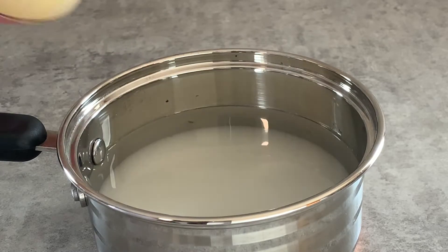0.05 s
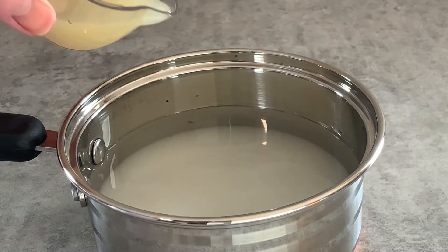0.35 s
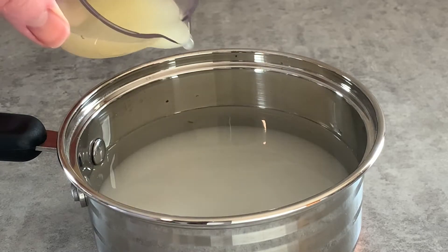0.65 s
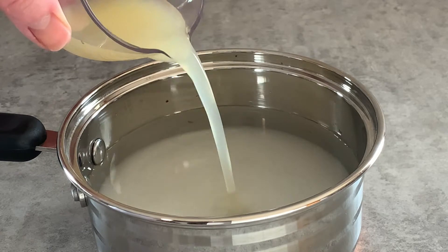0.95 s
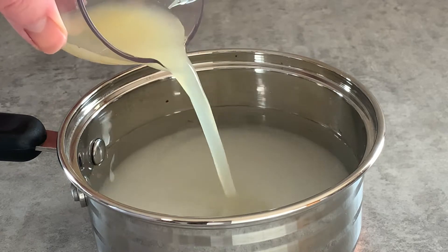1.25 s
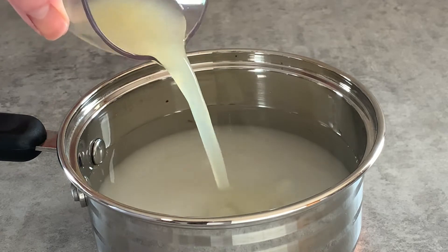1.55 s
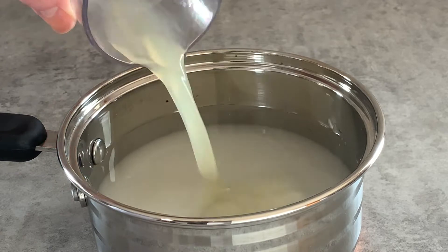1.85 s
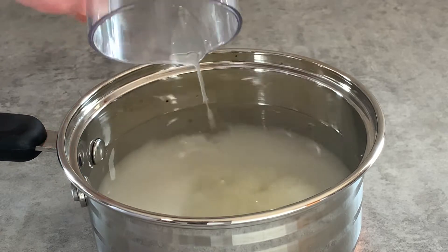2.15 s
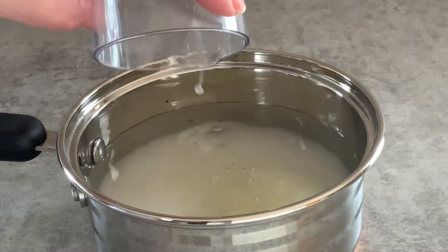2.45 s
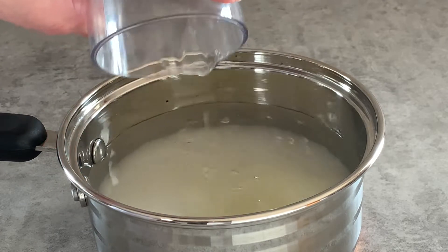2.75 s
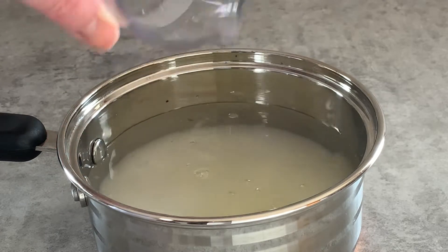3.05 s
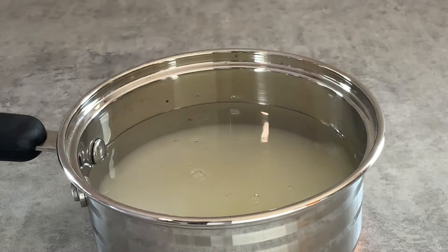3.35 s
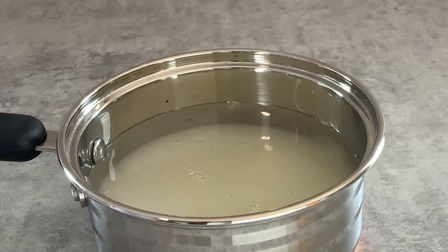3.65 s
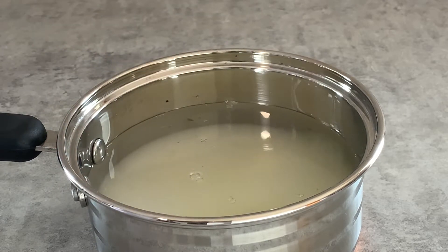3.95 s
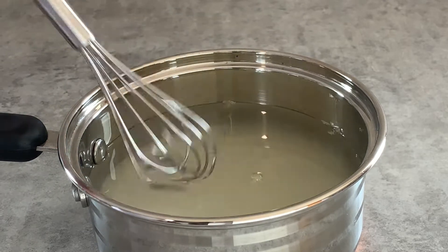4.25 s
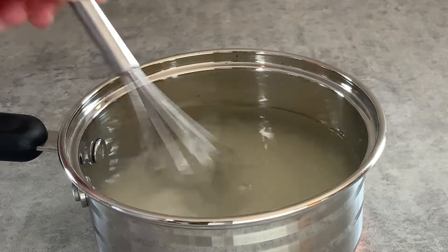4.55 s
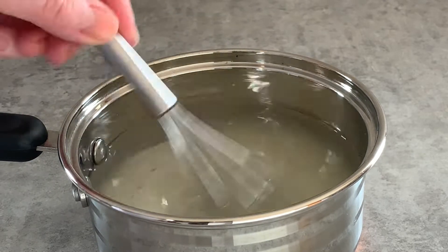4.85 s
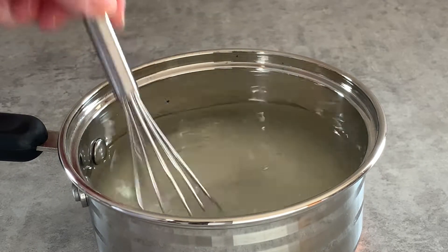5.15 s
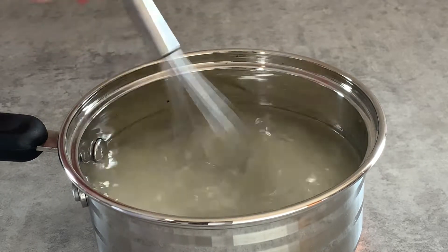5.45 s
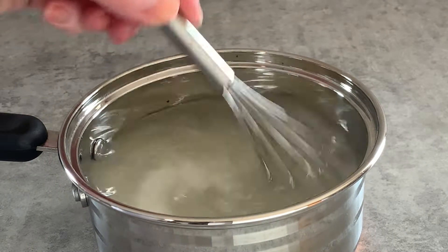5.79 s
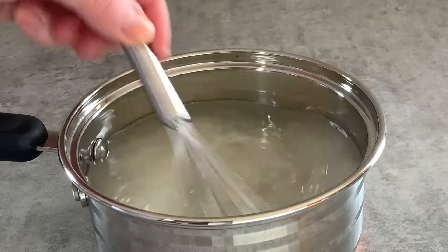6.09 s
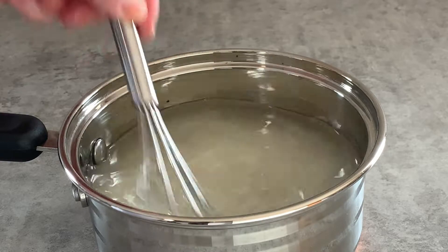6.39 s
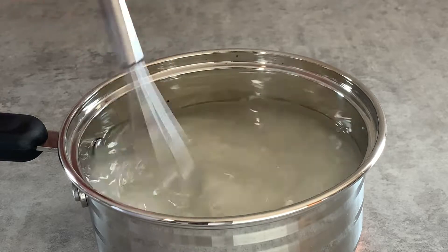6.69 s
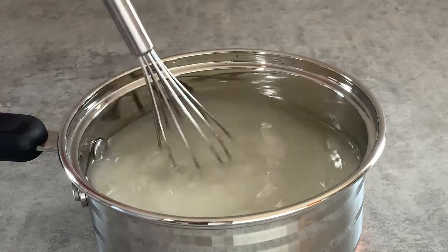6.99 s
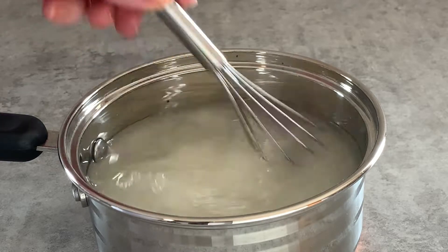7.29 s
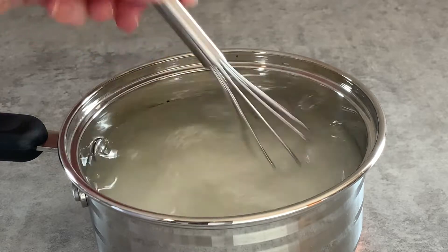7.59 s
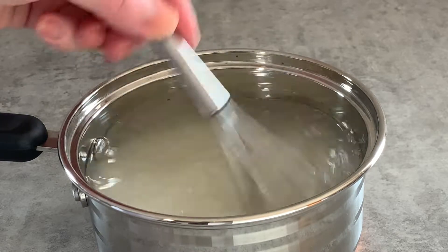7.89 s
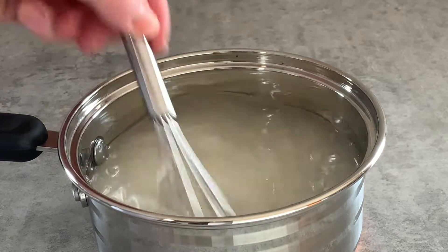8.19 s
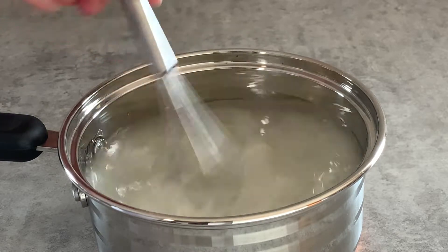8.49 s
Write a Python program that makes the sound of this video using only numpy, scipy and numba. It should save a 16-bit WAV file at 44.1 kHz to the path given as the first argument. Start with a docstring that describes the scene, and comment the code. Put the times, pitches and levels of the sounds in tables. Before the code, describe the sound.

After a few faint drips, a metal whisk stirs sugar water in a saucepan, with gritty scraping, sloshing and clicks over a soft kitchen hum.

```python
"""A wire whisk sweeps to and fro in a steel saucepan of sugar water. Its wires grind sugar over the
bottom, churn up bubbles and clack against the wall, which rings briefly, damped by the water.
Before the whisking, juice slides in almost silently, with a few drips.
Behind it all is a small kitchen with a humming appliance, heard by a phone with two microphone
ports close to the pan."""
import sys
import numpy as np
from scipy import signal
from scipy.fft import rfft, irfft, next_fast_len
from scipy.io import wavfile
from scipy.ndimage import uniform_filter1d
from numba import njit

SR = 44100
rng = np.random.default_rng(int(sys.argv[2]) if len(sys.argv) > 2 else 0)


def generate_wav(signal):
    """Clip the signal to [-1, 1] and save it as 16-bit WAV at the path in sys.argv[1]."""
    frames = np.transpose(np.atleast_2d(signal))
    scaled = np.clip(frames, -1, 1) * 32767
    pcm = np.round(scaled).astype(np.int16)
    wavfile.write(sys.argv[1], SR, pcm)


N = 380583
TIME = np.arange(N) / SR
FFT_SIZE = next_fast_len(N + SR)
LOG_HZ = np.log(np.maximum(np.arange(FFT_SIZE // 2 + 1) * SR / FFT_SIZE, 1))

# Table levels are faders: they set the balance within a layer, ahead of its EQ and trim.
# room tone, its stereo side signal, and the reverb: freq_hz, gain_db
AIR_EQ = [(25, -24), (36, -14), (50, 3), (90, 0), (160, 3.5), (340, 2), (410, -4), (560, -7), (800, -9),
          (930, -14), (1080, -14), (2600, -27.5), (4600, -34), (6100, -29.5), (7500, -34), (9600, -52.5),
          (11500, -37), (15000, -47)]
SIDE_EQ = [(60, -8.5), (200, -6.5), (500, -2.0), (1200, 0.0), (5000, 0.0)]
REVERB_EQ = [(45, -19), (100, -9), (600, 1.5), (1300, 7.5), (5000, 3.5), (7500, -2.5), (9500, -14),
             (12000, 1), (15000, -2)]
# partials of the appliance's hum: pitch_hz, level_db
HUM_PARTIALS = [(119.8, -64.5), (157, -71), (205.5, -63), (237, -69.5), (256, -77.5), (295.7, -68.5),
                (318, -72), (357, -65), (414.8, -76), (474, -79.5), (621, -77), (707, -80.5), (894, -77.5)]
# thin bands of hiss from the appliance: centre_hz, width_hz, level_db
WHINE_BANDS = [(911, 21, -72.5), (2770, 92, -85), (6100, 130, -85)]
# stereo image at the microphone ports: freq_hz, left_lead_rad, left_minus_right_db
PORT_IMAGE = [(300, 0, 1.5), (650, -.3, -3), (1250, -.4, -4.5), (2100, -1.5, 4), (3000, -3.1, 1.5),
              (4100, -6.3, 4), (4900, -9, 8), (6200, -12.2, 1), (7400, -11.6, -1), (9600, -9.4, 0),
              (12600, -6.4, 0), (14000, -6.2, 0), (15600, -3.7, 0)]
# brief dips in the overall level: start_s, end_s
LEVEL_DIPS = [(1.912, 1.929), (1.955, 1.980), (4.069, 4.105)]

# drips from the jug: start_s, bubble_pitch_hz, bubble_db, tick_db
JUICE_DRIPS = [(0.836, 6600, -38, -36.5), (0.839, 1630, -52, -47), (0.841, 1305, -44, -39),
               (0.849, 1400, -50, -50), (.856, 1230, -48, -48), (0.84, 1040, -48, -44),
               (1.375, 12700, -41, -60), (1.521, 7600, -69, -69), (2.056, 2070, -47, -47),
               (2.063, 11800, -37, -54), (2.0717, 7700, -37, -37), (2.089, 2970, -43, -47),
               (2.097, 4760, -41, -65), (2.106, 8900, -27, -60), (2.1096, 4510, -31, -31.5),
               (2.1158, 6430, -44, -44), (2.128, 5900, -51, -51), (2.1338, 5870, -37, -42),
               (2.243, 1590, -49, -68)]
# soft rustles of spray and handling: start_s, level_db, decay_s
SOFT_RUSTLES = [(0.843, -57, 0.039), (3.034, -56, 0.093), (4.112, -58, 0.21)]
# tone of the drip ticks and of the rustles: freq_hz, gain_db
TICK_EQ = [(200, -12), (1000, -6), (3000, -10.5), (6000, 4), (12000, -2), (15000, -5)]
RUSTLE_EQ = [(200, 20), (1000, -0.5), (2500, 1.5), (4000, -5.5), (5500, -16), (15000, -33)]

# sweeps of the whisk across the pan: start_s, length_s, scrape_db, churn_db
SWEEPS = [(4.353, 0.1, -47, -50.5), (4.508, 0.15, -66, -51), (4.59, 0.18, -49.5, -51),
          (4.838, 0.17, -46, -56), (5.061, 0.2, -44, -51), (5.304, 0.2, -41.5, -52.5),
          (5.597, .15, -42.5, -53.5), (5.818, .25, -42.5, -53.5), (6.089, 0.15, -43, -51.5),
          (6.26, 0.12, -40.5, -51), (6.39, 0.12, -45.5, -57), (6.514, 0.13, -40, -50),
          (6.67, 0.11, -49.5, -66), (6.734, 0.25, -39.5, -50), (7.008, 0.21, -41.5, -57),
          (7.206, 0.16, -41, -50.5), (7.377, 0.19, -40, -59), (7.583, 0.2, -40, -50),
          (7.728, 0.2, -39, -50), (7.884, 0.17, -36.5, -55), (8.025, 0.19, -39.5, -47.5),
          (8.18, 0.17, -40, -50.5), (8.31, 0.24, -38.5, -48), (8.535, .12, -42, -50)]
# air and wall resonances that colour the water: centre_hz, width_hz, level_db
HOLLOW_MODES = [(433, 150, 1), (833, 27, -12.5), (1040, 115, 1.5), (1266, 106, 4.5), (1840, 160, -33),
                (2330, 260, 0)]
# tone of the lone, mid-sized bubbles: freq_hz, gain_db
PLOP_EQ = [(330, 3.5), (500, -2.5), (750, -1.5), (1050, 1.5), (1600, -5), (2300, 1.5)]
# waves slapping the wall: start_s, slap_db, thump_db
WAVES = [(4.35, -43, -58), (5.22, -49, -50), (5.74, -40, -57), (6.02, -46.5, -66), (6.308, -40.5, -58),
         (6.88, -34, -51), (7.04, -49, -50), (7.28, -42, -54.5), (7.81, -42.5, -58), (8.06, -44, -61),
         (8.32, -45.5, -62)]
# large air pockets closing behind the whisk: start_s, pitch_hz, level_db
AIR_POCKETS = [(4.367, 1208, -43), (4.366, 430, -43), (4.395, 1137, -47.5), (4.432, 1030, -47),
               (4.529, 1005, -40.5), (4.572, 1024, -42.5), (4.621, 1256, -42), (4.748, 1096, -45),
               (4.899, 2320, -48), (4.93, 1050, -45), (5.032, 383, -40), (5.105, 642, -45.5),
               (5.18, 1000, -39.5), (5.182, 2280, -48), (5.262, 1030, -49), (5.416, 1020, -42),
               (5.73, 978, -41), (5.741, 368, -35.5), (5.757, 2064, -34.5), (5.87, 832, -40),
               (5.897, 1065, -39.5), (6.042, 493, -40.5), (6.045, 1270, -43.5), (6.164, 1034, -43.5),
               (6.412, 1034, -41.5), (6.441, 1030, -41.5), (6.554, 1320, -35.5), (6.591, 1036, -40.5),
               (6.689, 1100, -43), (6.721, 1000, -45), (6.772, 1050, -40), (6.835, 422, -35.5),
               (6.851, 1420, -30.5), (6.872, 297, -36), (6.904, 418, -33), (6.906, 586, -33),
               (6.924, 337, -32.5), (6.955, 597, -42), (6.985, 587, -45), (7.051, 316, -35.5),
               (7.062, 426, -37), (7.07, 1490, -35), (7.1, 416, -37), (7.212, 1320, -42),
               (7.264, 1700, -38), (7.27, 706, -38), (7.283, 383, -38), (7.321, 503, -38.5),
               (7.469, 1056, -37.5), (7.513, 2245, -34.5), (7.699, 434, -51), (7.766, 1284, -40),
               (7.817, 435, -34), (7.817, 1226, -39.5), (7.86, 475, -43), (8.068, 394, -34.5),
               (8.104, 460, -39.5), (8.333, 416, -37), (8.412, 1050, -39.5), (8.472, 1090, -28.5),
               (8.492, 1110, -38), (8.519, 1055, -41), (8.568, 2350, -33.5), (8.572, 480, -38)]

# wire resonances of the whisk: centre_hz, width_hz, level_db
WIRE_MODES = [(2295, 560, -0.5), (4680, 106, -7), (5470, 210, 5.5), (6820, 130, 6), (7560, 120, 0.5),
              (8610, 480, 16), (11320, 860, 8.5)]
# tone of the grinding sugar and of the wires' rattle: freq_hz, gain_db
GRIND_EQ = [(400, -11.5), (1500, -6.5), (3000, -0.5), (3500, -4), (4300, -4.5), (5300, -7), (6500, -0.5),
            (7400, -2.5), (9100, 2), (10500, 2.5), (12500, 6), (15000, -3.5)]
RATTLE_EQ = [(150, -34), (400, -4), (1000, -9.5), (2100, -6), (3100, -10.5), (4500, -2), (5500, 0.5),
             (6700, -1), (9000, 1), (11000, -5), (13000, -5.5), (15000, -6.5)]
# short gliding tones: wires dragging along the bottom, and a few rising bubbles: start_s, length_s, from_hz,
# to_hz, level_db
GLIDES = [(4.951, 0.11, 1800, 2020, -56.5), (5.407, .04, 8000, 7700, -45),
          (5.649, 0.051, 7800, 7800, -42.5), (5.69, 0.021, 7900, 7800, -45),
          (5.944, 0.032, 7700, 7100, -50), (5.995, 0.034, 6640, 6350, -44),
          (6.001, 0.048, 2970, 3130, -45), (5.981, 0.061, 2220, 2350, -53.5),
          (6.571, 0.03, 3770, 4170, -43.5), (7.017, 0.03, 2450, 2110, -40.5),
          (7.914, 0.056, 2300, 2160, -48), (7.94, 0.048, 9200, 9200, -39)]
# modes of the steel wall: pitch_hz, level_db, t60_s
WALL_MODES = [(711, -13, .2), (1196, -10, .1), (1305, -8, .15), (1438, -10, .12), (1636, -13, .12),
              (1870, -6, .1), (1950, -2, .06), (2028, -1.5, .12), (2130, -4, .05), (2374, -7, .07),
              (2520, -12, .06), (3260, -21, .07), (3677, -22, .2), (4315, -6, .18), (4472, -8, .18),
              (4700, -6, .05), (4805, -9, .2), (5520, -13, .13), (6083, -11, .17), (6885, -7, .18),
              (7380, -9, .12)]
# wires striking the pan: start_s, contact_db, rattle_decay_ms, wall_db, twang_pitch_hz, twang_db
WIRE_HITS = [(4.363, -39.5, 7.5, -65, 4600, -55), (5.477, -29, 1.5, -70, 8800, -51),
             (5.754, -34, 8.3, -37, 5100, -37), (6.038, -48, 2.6, -53, 6280, -33),
             (6.186, -34, 5.3, -55, 8780, -26.5), (6.324, -28, 3.3, -46, 7200, -46),
             (6.412, -44, 3, -67, 9000, -40), (6.443, -37, 3.4, -64, 9240, -28.5),
             (6.523, -47, 5, -46, 3160, -35), (6.829, -24, 2.9, -53, 11500, -43),
             (6.836, -26.5, 5.4, -40, 6900, -30), (6.852, -33, 3.1, -58, 5400, -35),
             (6.868, -24.5, 2.5, -55, 7160, -47), (6.903, -21, 2.6, -62, 6960, -19.5),
             (6.915, -26, 5.3, -59, 6960, -36), (6.92, -30, 1.9, -58, 6830, -26),
             (7.047, -24, 7.8, -33, 4170, -29.5), (7.07, -27.5, 16, -47, 5630, -43),
             (7.090, -19.5, 3.2, -54, 9000, -21), (7.095, -27, 2.4, -49, 5330, -24),
             (7.117, -37, 3.5, -51, 5500, -29), (7.236, -32, 6, -57, 4360, -34.5),
             (7.246, -28, 4.4, -55, 5320, -30), (7.263, -24.5, 5.4, -43, 4640, -31),
             (7.47, -33, 1.8, -58, 11200, -49), (7.576, -25, 4.1, -43, 4850, -39),
             (7.8116, -20.5, 2.5, -49, 7060, -20.5), (8.055, -11, 4.6, -23.5, 4650, -19.5),
             (8.313, -28.5, 2.5, -43.5, 7000, -35), (8.316, -24.5, 3.5, -44, 6255, -25.5),
             (8.344, -37, 2.6, -48, 6330, -40), (8.376, -37, 1.7, -54, 9500, -40),
             (8.470, -35, 3, -41, 8380, -32)]

ROOM_T60_S, TREBLE_T60_S, TREBLE_HZ = .45, .19, 7450  # the tail dies sooner in the treble
DRIP_CYCLES, GLUG_CYCLES = 7.3, 10.4  # cycles to fade by 1/e; for glugs, at 1 kHz
SWEEP_RISE_S, SWEEP_FALL_S = .028, .044  # the hand speeds up, holds, slows for the turn
WAVE_RISE_S, WAVE_DECAY_S = .017, .091
HOLLOW_SWAY, SWAYS_PER_S = .038, 9  # share by which the rocking water bends the hollow's pitches
FLICK_DB, FLICKS_PER_S = 2.5, 24  # the wires catch and let go within a sweep
REBOUND_S, REBOUND_DB = .0045, -33  # a second wire lands just after the first
TWANG_RISE_S = .0016
TWIN_DB, TWIN_DETUNE = -4, .0134  # each wall mode's weaker partner, and its widest detune as a share


def undb(db):
    """Decibels to gain."""
    return 10 ** (np.asarray(db) / 20)


def level(x, db=0):
    """Set the rms level."""
    return x * undb(db) / np.sqrt(np.mean(x ** 2))


def curve(rows, column=1):
    """Draw one column of a table across the spectrum, on a log-frequency axis."""
    rows = np.array(rows)
    return np.interp(LOG_HZ, np.log(rows[:, 0]), rows[:, column])


def eq(x, points):
    """Minimum-phase EQ through points of freq_hz, gain_db."""
    cepstrum = irfft(np.log(undb(curve(points))), FFT_SIZE)
    cepstrum[1:FFT_SIZE // 2] *= 2
    cepstrum[FFT_SIZE // 2 + 1:] = 0
    return irfft(rfft(x, FFT_SIZE) * np.exp(rfft(cepstrum)), FFT_SIZE)[..., :N]


def resonate(x, hz, width_hz):
    """One resonance, unity gain at its centre."""
    return signal.lfilter(*signal.iirpeak(hz, hz / width_hz, SR), x)


@njit
def gliding_resonance(x, hz, width_hz):
    """A resonance whose centre follows a pitch curve."""
    out, state = np.empty(len(x)), 0j
    for i in range(len(x)):
        state = state * np.exp((2j * hz[i] - width_hz) * np.pi / SR) + x[i]
        out[i] = state.imag
    return out


def drift(per_s):
    """Smooth random modulation with a spread near 1."""
    knots = rng.standard_normal(4096)
    return np.interp(TIME * per_s, np.arange(len(knots)), knots)


def flicker_bands(x, low_hz, high_hz, count, depth_db, per_s):
    """Let neighbouring bands swell and fade, each on its own."""
    centres = np.linspace(np.log(low_hz), np.log(high_hz), count)
    spectrum = rfft(x, FFT_SIZE)
    bands = (irfft(spectrum * np.interp(LOG_HZ, centres, solo), FFT_SIZE)[:N] for solo in np.eye(count))
    return sum(band * undb(depth_db * drift(per_s)) for band in bands)


def add(track, start_s, sound):
    """Mix a sound into a track."""
    i = int(start_s * SR)
    track[i:i + len(sound)] += sound[:len(track) - i]


def burst(decay_s, rise_s):
    """A noise hit that swells quickly and dies away."""
    t = TIME[:SR // 5]
    return rng.standard_normal(len(t)) * (1 - np.exp(-t / rise_s)) * np.exp(-t / decay_s)


@njit
def grains(start_s, hz, gain, cycles, glide):
    """Damped sines whose pitch rises as they fade."""
    out = np.zeros(N)
    for k in range(len(start_s)):
        start, life, phase = int(start_s[k] * SR), cycles[k] * SR / hz[k], 0.
        for i in range(min(int(6 * life), N - start)):
            phase += 2 * np.pi * hz[k] * (1 + glide * i / life) / SR
            out[start + i] += gain[k] * np.exp(-i / life) * (1 - np.exp(-phase / 4)) * np.sin(phase)
    return out


def swarm(count, low_hz, high_hz, cycles, spread_db, glide):
    """An even shower of grains at unit rms: many quiet, few loud."""
    when, pitch, size, life = rng.random((count, 4)).T
    hz = low_hz * (high_hz / low_hz) ** pitch
    gain = undb(-spread_db * np.log(1 - .985 * size)) * np.sqrt(hz / low_hz)
    return level(grains(when * N / SR, hz, gain, cycles * (.5 + life), glide))


def kitchen():
    """The bed: airy room tone, narrower in the bass, with an appliance's wavering hum and thin whine."""
    left_right = np.array([[1], [-1]])
    mid, side = eq(rng.standard_normal((2, N)), AIR_EQ)
    air = undb(-58) * (mid + eq(side, SIDE_EQ) * left_right) / mid.std()
    hum = whine = 0
    for hz, db in HUM_PARTIALS:
        peak = np.sqrt(2) * undb(db + 2 * drift(7.6))
        hum += peak * np.sin(2 * np.pi * hz * TIME + .72 * drift(12))
    for hz, width_hz, db in WHINE_BANDS:
        hiss = resonate(rng.standard_normal((2, N)), hz, width_hz)
        whine += level(hiss, db) * undb(2.2 * drift(11))
    return (air * undb(.4 * drift(2.35)) + hum + whine) * undb(.64 * left_right)


def reverb(x, tail_db, early_db, early_decay_s):
    """The kitchen's darkening stereo tail, plus quick, shifting reflections off pan and worktop."""
    t = TIME[:SR * 3 // 4]
    noise = rng.standard_normal((2, len(t)))
    body = signal.sosfiltfilt(signal.butter(3, TREBLE_HZ, fs=SR, output="sos"), noise)
    treble = (noise - body) * np.exp(-np.log(1000) * t * (1 / TREBLE_T60_S - 1 / ROOM_T60_S))
    fade = np.exp(-np.log(1000) * t / ROOM_T60_S) * (1 - np.exp(-t / .018))
    tail = undb(tail_db) * (body + treble) * fade / np.linalg.norm(fade)
    wet = signal.fftconvolve(x[None], tail, axes=1)[:, :N]
    early = (np.exp(-t / early_decay_s) * (1 - np.exp(-t / .00065)))[:SR // 10]
    # the source wanders among four places in the pan, each with its own reflections
    places = np.array([drift(6) for _ in range(4)])
    for share in places / np.linalg.norm(places, axis=0):
        response = undb(early_db) * rng.standard_normal((2, len(early))) * early / np.linalg.norm(early)
        wet += signal.oaconvolve((share * x)[None], response, axes=1)[:, :N]
    return eq(wet, REVERB_EQ)


def mic_ports(x):
    """Close sound turns stereo as it takes different paths round the phone to the two ports."""
    left = np.exp(.5j * curve(PORT_IMAGE)) * undb(curve(PORT_IMAGE, column=2) / 2)
    return irfft(rfft(x, FFT_SIZE) * np.array([left, 1 / left]), FFT_SIZE)[:, :N]


def pour():
    """Drops tick on the surface and trap a bubble each; spray and handling rustle softly."""
    ticks, rustle = np.zeros(N), np.zeros(N)
    drip_s, hz, bubble_db, tick_db = np.array(JUICE_DRIPS, float).T
    for start_s, db in zip(drip_s, tick_db):
        add(ticks, start_s, undb(db + 1.5) * burst(decay_s=.0015, rise_s=.00043))
    for start_s, db, decay_s in SOFT_RUSTLES:
        add(rustle, start_s, undb(db) * rng.standard_normal(SR) * np.exp(-TIME[:SR] / decay_s))
    bubbles = grains(drip_s, hz, undb(bubble_db), np.full(len(hz), DRIP_CYCLES), glide=.0097)
    return eq(ticks, TICK_EQ) + bubbles + eq(rustle, RUSTLE_EQ)


def sweep_envelope(column, idle_db, lag_s, exponent):
    """Gain that rides the whisk's speed; from the second sweep on, motion carries through the turns."""
    t = TIME - lag_s
    power = undb(idle_db) ** 2 * np.clip((t - SWEEPS[1][0]) / SWEEP_RISE_S, 0, 1)
    for sweep in SWEEPS:
        start_s, length_s = sweep[:2]
        rising = (t - start_s) / min(SWEEP_RISE_S, length_s / 2)
        falling = (start_s + length_s - t) / min(SWEEP_FALL_S, length_s / 2)
        speed = np.clip(np.minimum(rising, falling), 0, 1)
        power += (undb(sweep[column]) * speed ** exponent) ** 2
    return np.sqrt(power)


def slosh():
    """Waves meet the wall with a low slap and a deep thump, swelling quickly and settling."""
    slap = swarm(count=700, low_hz=150, high_hz=520, cycles=4.5, spread_db=3, glide=.03)
    thump = swarm(count=160, low_hz=55, high_hz=115, cycles=4, spread_db=2, glide=.02)
    slap_gain, thump_gain, t = np.zeros(N), np.zeros(N), TIME[:SR]
    swell = (1 - np.exp(-t / WAVE_RISE_S)) * np.exp(-t / WAVE_DECAY_S)
    swell /= swell.max()
    for start_s, slap_db, thump_db in WAVES:
        add(slap_gain, start_s, undb(slap_db) * swell)
        add(thump_gain, start_s, undb(thump_db) * swell)
    return undb(-10.5) * slap * slap_gain + thump * thump_gain


def glugs():
    """Air pockets close behind the whisk and ring; smaller, higher ones last more cycles."""
    start_s, hz, db = np.array(AIR_POCKETS, float).T
    return grains(start_s, hz, undb(db), GLUG_CYCLES * (hz / 1000) ** .84, glide=.014)


def churn():
    """Bubbles torn off by the wires sound in the pan's swaying hollow, with lone plops on top."""
    bubbles = swarm(count=2000, low_hz=280, high_hz=2650, cycles=8, spread_db=3.3, glide=.012)
    hollow = 0
    for hz, width_hz, db in HOLLOW_MODES:
        swaying_hz = hz * np.exp(HOLLOW_SWAY * drift(SWAYS_PER_S))
        hollow += level(gliding_resonance(bubbles, swaying_hz, float(width_hz)), db)
    plops = swarm(count=520, low_hz=330, high_hz=2600, cycles=11, spread_db=2.4, glide=.022)
    water = level(hollow + .098 * bubbles, -4) + undb(-5) * eq(plops, PLOP_EQ)
    # the water answers late and less steeply than the wires
    flow = sweep_envelope(column=3, idle_db=-58.5, lag_s=.0029, exponent=.32)
    return water * flow * undb(2 * drift(30))


def glides():
    """Short gliding tones, each a narrow band of noise: wires dragging along the bottom, and a few rising
    bubbles."""
    out = np.zeros(N)
    for start_s, length_s, from_hz, to_hz, db in GLIDES:
        n = int(length_s * SR)
        squeak = gliding_resonance(rng.standard_normal(n), np.geomspace(from_hz, to_hz, n), width_hz=160.)
        add(out, start_s, level(squeak, db) * np.hanning(n))
    return out


def scrape():
    """Wires stick and slip on sugar grains and sing as they flex; tiny ticks ping and spatter off the wires."""
    slips = (rng.random(N) < .12) * rng.standard_normal(N)
    slips *= undb(1.9 * np.minimum(rng.exponential(size=N), 6))  # a few bite much harder
    singing = 0
    for hz, width_hz, db in WIRE_MODES:
        bent_hz = hz * np.exp(.035 * drift(20))
        singing += level(gliding_resonance(slips, bent_hz, float(width_hz)), db) * undb(5 * drift(30))
    # each wire touches down at its own moment and brings its own band
    grit = flicker_bands(slips, low_hz=1800, high_hz=15000, count=30, depth_db=5.6, per_s=48)
    pings = swarm(count=2200, low_hz=3800, high_hz=9000, cycles=36, spread_db=3.4, glide=.001)
    spatter = swarm(count=600, low_hz=3200, high_hz=14000, cycles=6, spread_db=3.4, glide=.004)
    # wires slip off the steel and chirp for a moment
    chirps = swarm(count=330, low_hz=6000, high_hz=8800, cycles=55, spread_db=2.6, glide=.0005)
    grind = level(eq(level(grit) + undb(-3) * pings, GRIND_EQ))
    texture = grind + undb(-14) * spatter + undb(-6.5) * chirps
    squeaking = glides()
    judder = undb(1.2 * drift(70) + FLICK_DB * drift(FLICKS_PER_S))
    drag = sweep_envelope(column=2, idle_db=-49.5, lag_s=0, exponent=.66)
    return (undb(-8) * texture + level(singing, -9)) * drag * judder + squeaking


def wall_ring(t):
    """The struck wall rings in close pairs of modes, detuned by the water swaying against it."""
    hz, db, t60_s = np.array(WALL_MODES).T[:, :, None]
    detune = TWIN_DETUNE * rng.choice([-1, 1], hz.shape) * rng.uniform(.21, 1, hz.shape)
    pairs = np.sin(2 * np.pi * hz * t) + undb(TWIN_DB) * np.sin(2 * np.pi * hz * (1 + detune) * t)
    ring = (undb(db) * np.exp(-np.log(1000) * t / t60_s) * pairs).sum(0)
    buzz = 1 + .35 * drift(350)[:len(t)]  # wires still touching the wall
    return ring * buzz * (1 - np.exp(-t / .00091))


def clacks():
    """Each hit is a short rattle: one wire twangs, its neighbours jangle and the pan wall rings."""
    rattle, ring, t = np.zeros(N), np.zeros(N), TIME[:SR // 3]
    twang_envelope = t / TWANG_RISE_S * np.exp(1 - t / TWANG_RISE_S)
    for start_s, contact_db, decay_ms, wall_db, twang_hz, twang_db in WIRE_HITS:
        contact = burst(decay_ms / 1000, rise_s=.00071)
        delay_s = REBOUND_S * rng.uniform(.78, 2.3)
        add(contact, delay_s, undb(REBOUND_DB) * burst(decay_ms / 1000, rise_s=.00059))
        bends = np.exp(.05 * rng.standard_normal(len(WIRE_MODES)))
        jangle = sum(resonate(contact, hz * bend, width_hz)
                     for (hz, width_hz, _), bend in zip(WIRE_MODES, bends))
        add(rattle, start_s, undb(contact_db + 2) * (contact + jangle))
        add(ring, start_s, undb(twang_db) * np.sin(2 * np.pi * twang_hz * t) * twang_envelope)
        add(ring, start_s, undb(wall_db - 6.5) * wall_ring(t))
    return eq(rattle, RATTLE_EQ) + ring


def scene():
    """Whisk and drips up close, each with its own reverb, over the kitchen bed."""
    whisk = scrape() + churn() + slosh() + glugs() + clacks()
    drips = pour()
    whisk_reverb = reverb(whisk, tail_db=-10, early_db=-6, early_decay_s=.006)
    drip_reverb = reverb(drips, tail_db=-9, early_db=-4, early_decay_s=.017)
    return mic_ports(whisk + drips) + whisk_reverb + drip_reverb + kitchen()


def record(dry):
    """The level dips briefly three times, and a steep low-pass takes off the very top."""
    in_dip = sum((TIME > start_s) & (TIME < end_s) for start_s, end_s in LEVEL_DIPS)
    gain = undb(-23 * uniform_filter1d(in_dip.astype(float), size=90))
    low_pass = signal.ellip(8, .2, 70, 15600, fs=SR, output="sos")
    return signal.sosfilt(low_pass, dry * gain)


dry = scene()
out = record(dry)
generate_wav(out)
```